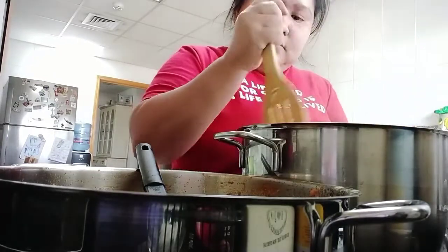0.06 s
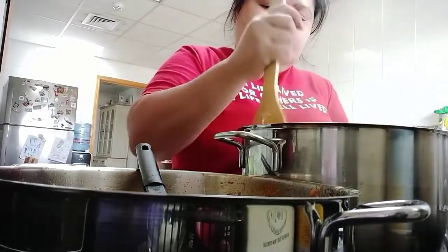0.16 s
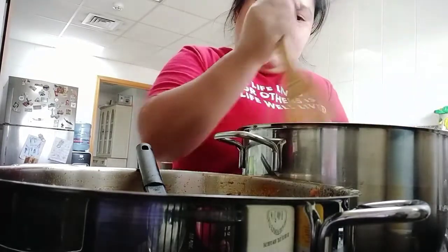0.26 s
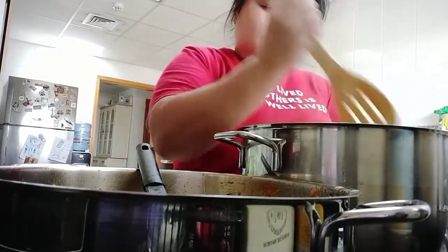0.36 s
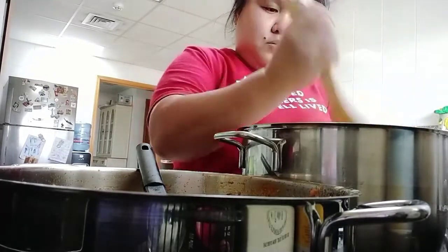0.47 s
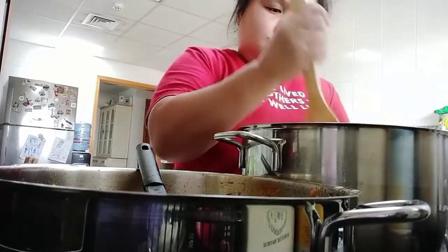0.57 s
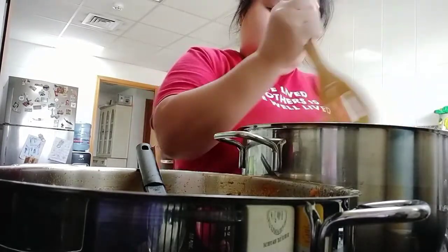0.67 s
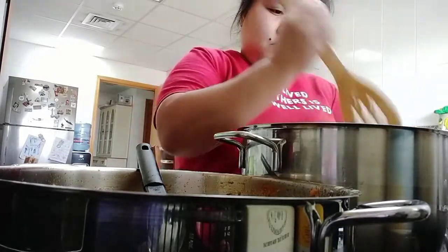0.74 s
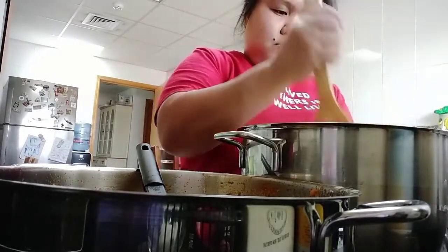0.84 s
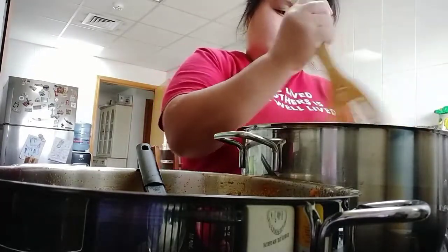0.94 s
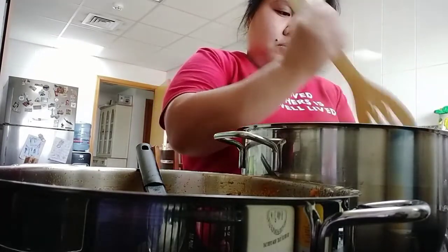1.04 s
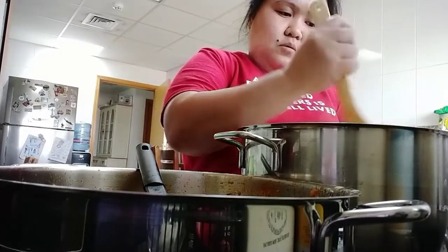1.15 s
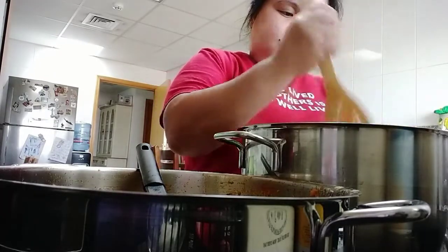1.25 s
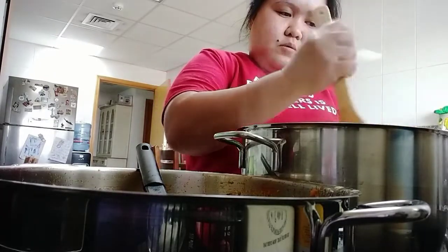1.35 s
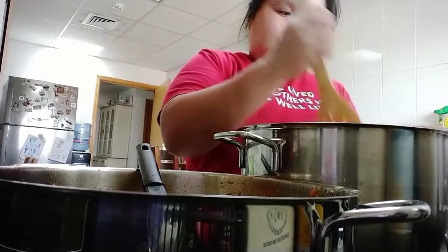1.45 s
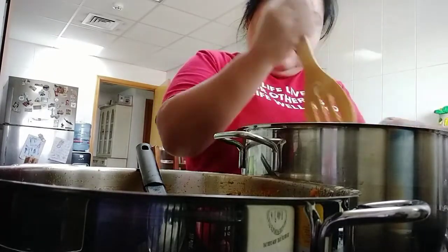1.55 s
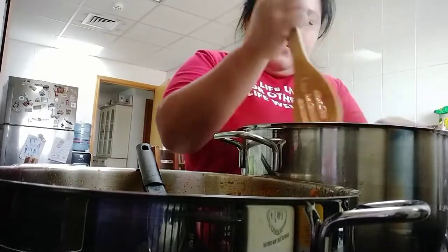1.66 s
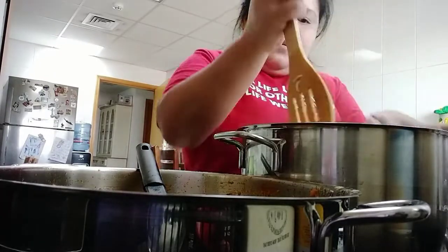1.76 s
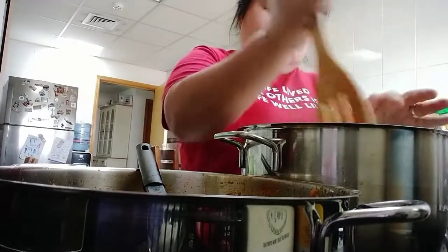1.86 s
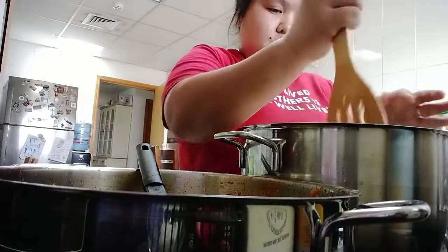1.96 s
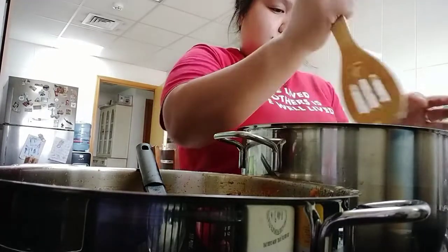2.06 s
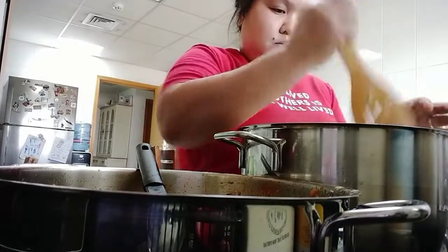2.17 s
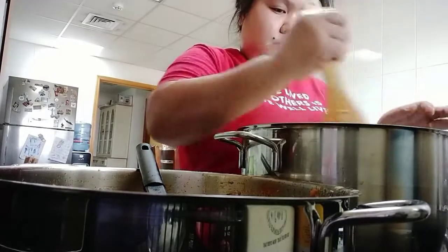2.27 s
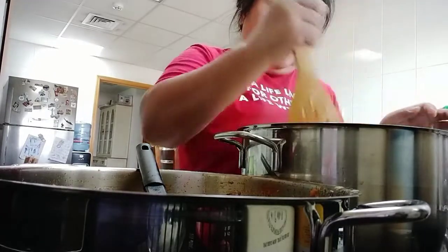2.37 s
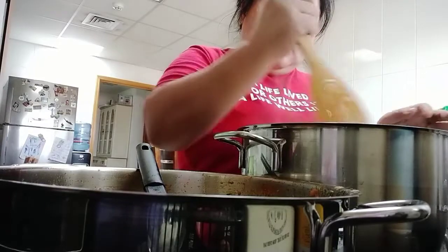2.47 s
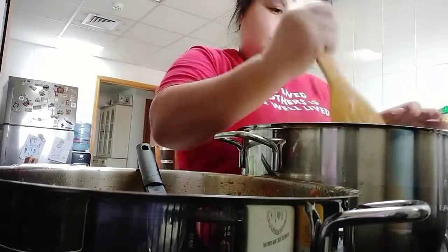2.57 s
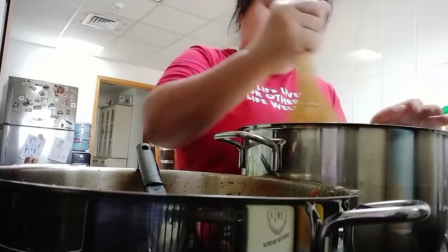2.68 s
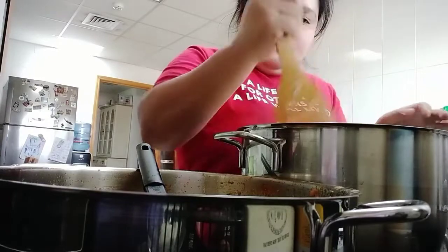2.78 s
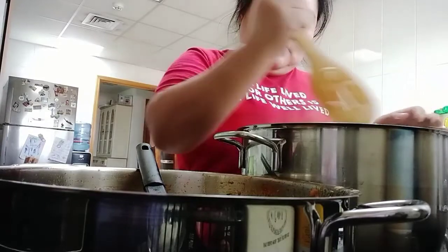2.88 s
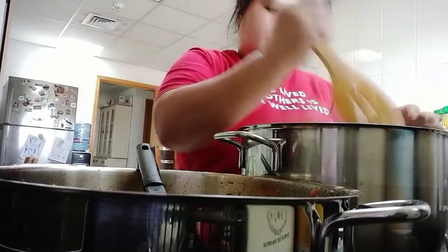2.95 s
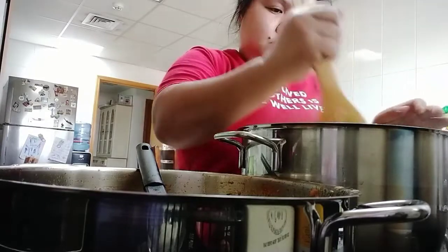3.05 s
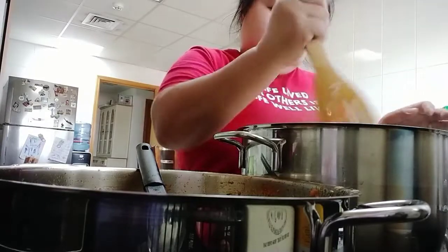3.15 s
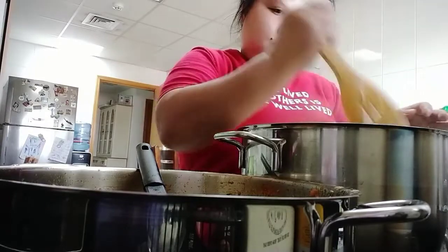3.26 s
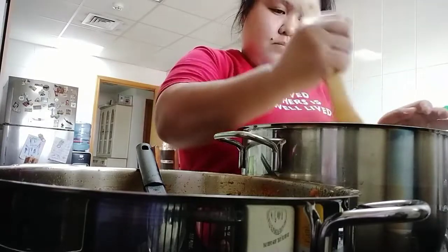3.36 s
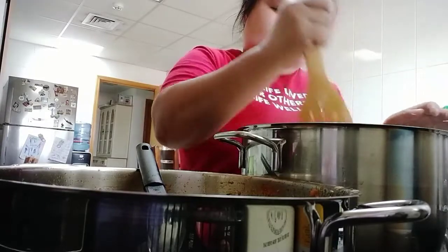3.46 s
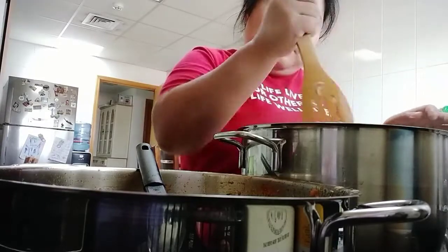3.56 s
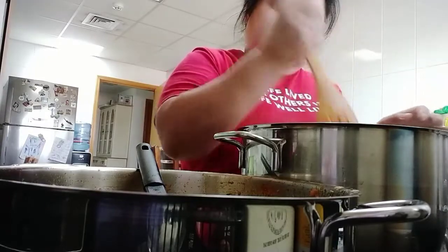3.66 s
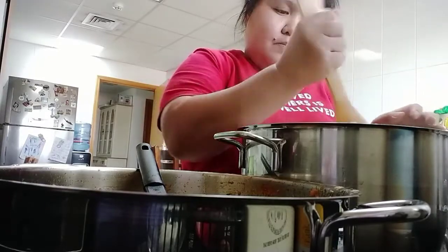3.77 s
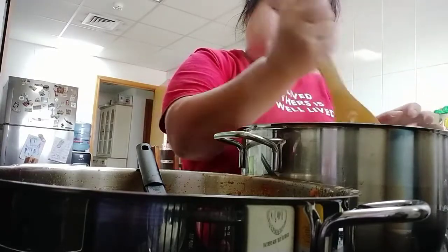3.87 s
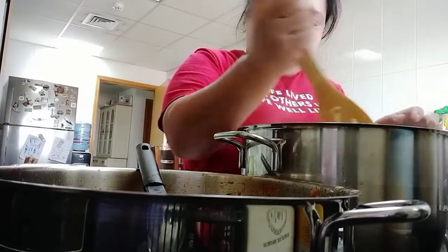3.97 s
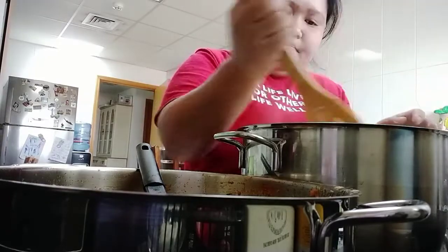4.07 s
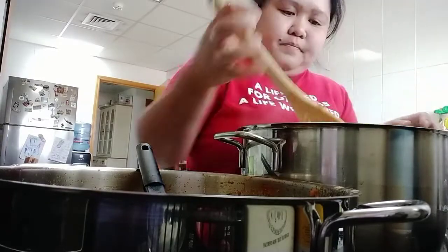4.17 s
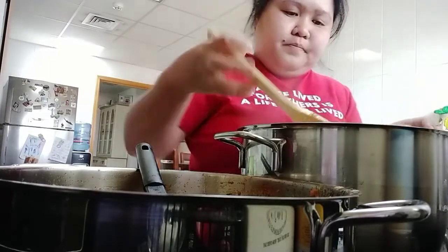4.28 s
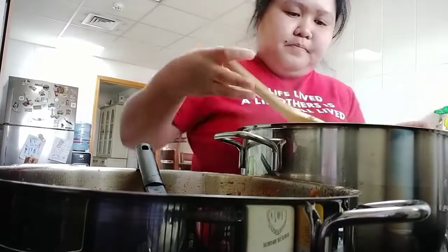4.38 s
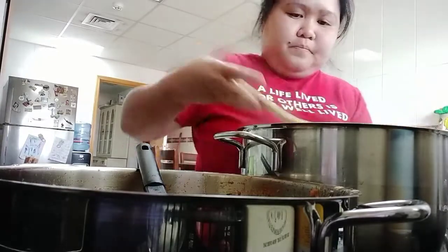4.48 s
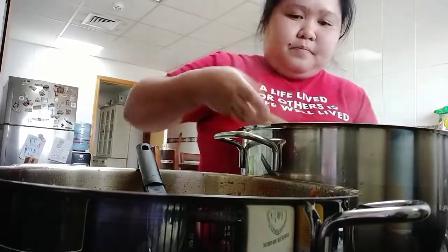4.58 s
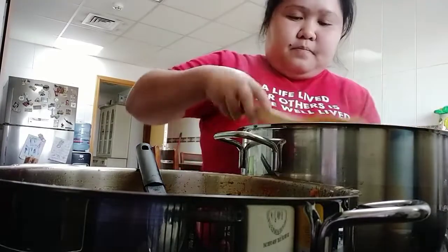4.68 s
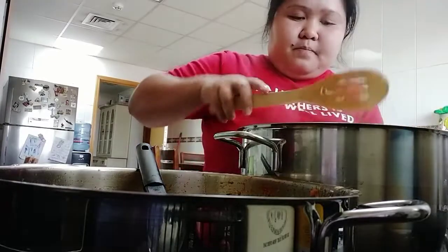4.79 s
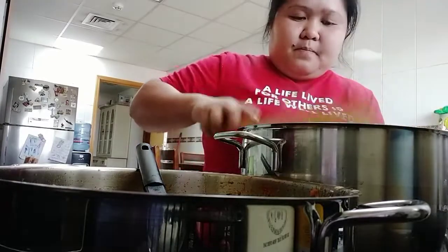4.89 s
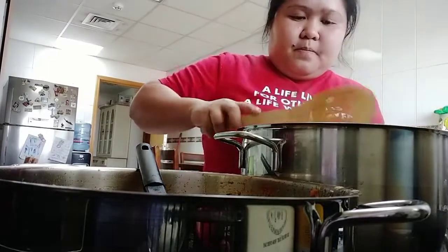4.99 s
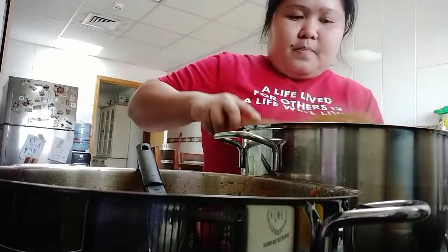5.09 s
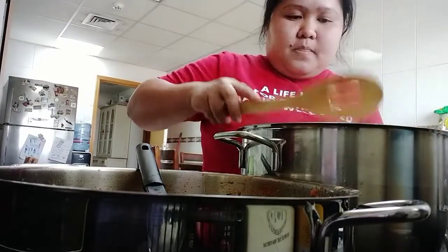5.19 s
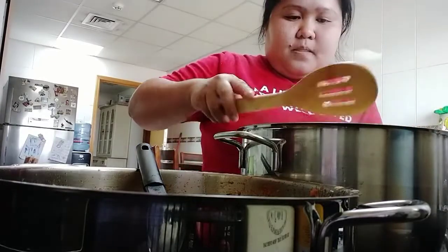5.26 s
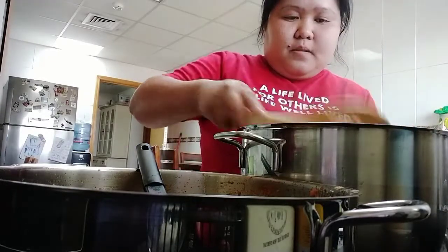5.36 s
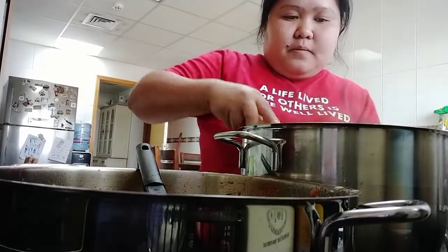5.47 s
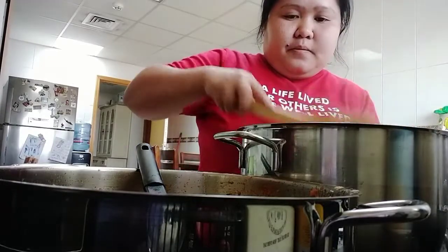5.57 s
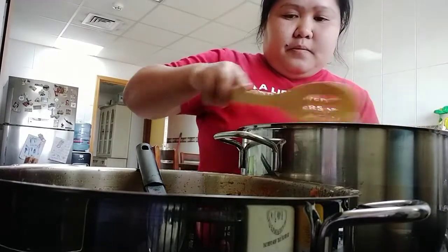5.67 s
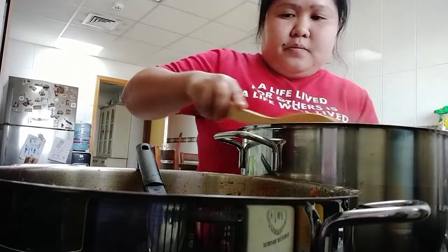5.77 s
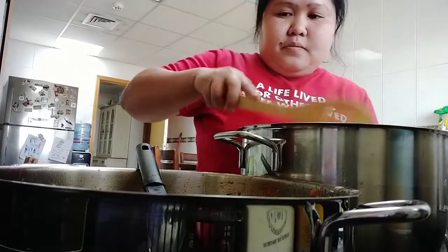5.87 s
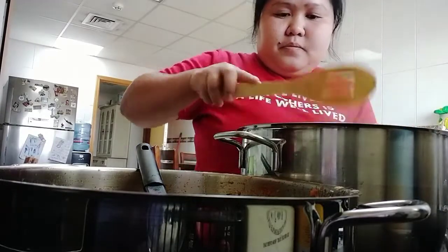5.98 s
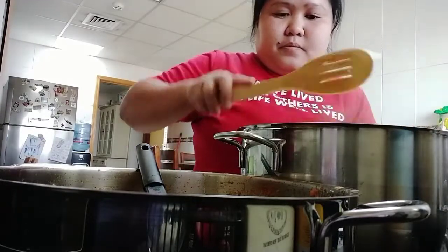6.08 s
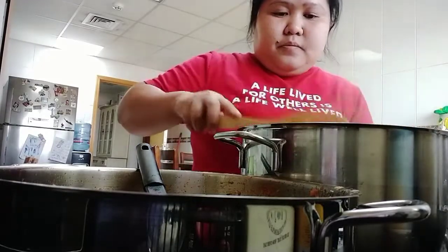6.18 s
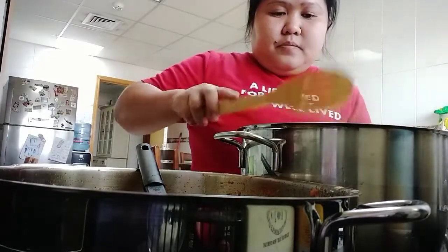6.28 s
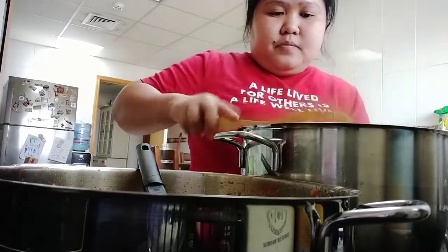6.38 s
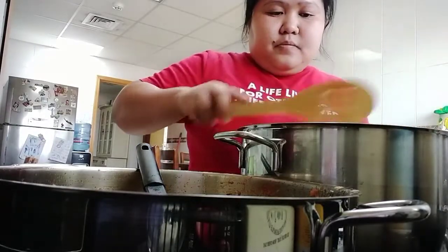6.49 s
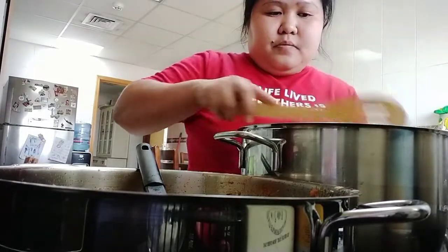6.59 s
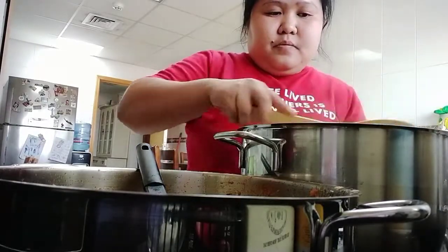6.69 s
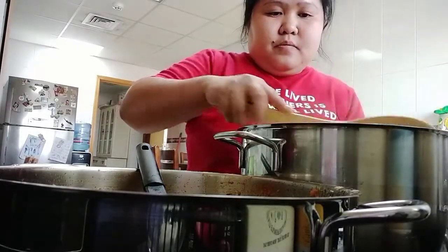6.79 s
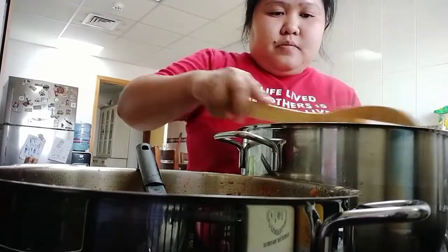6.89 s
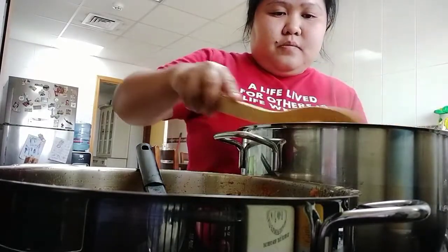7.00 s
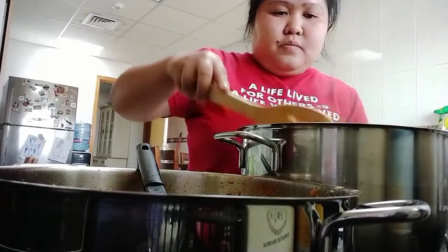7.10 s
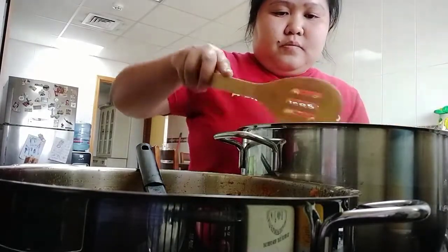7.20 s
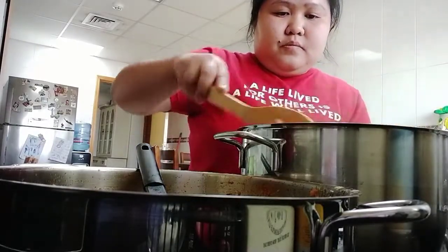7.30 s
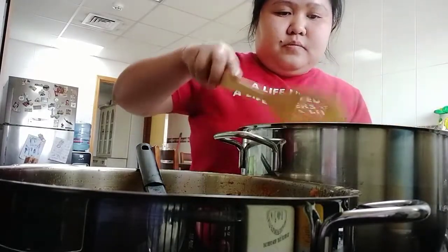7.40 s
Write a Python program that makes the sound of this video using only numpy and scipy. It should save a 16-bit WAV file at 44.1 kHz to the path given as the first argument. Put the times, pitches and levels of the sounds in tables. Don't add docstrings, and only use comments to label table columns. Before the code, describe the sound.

A quiet tiled kitchen, heard from a phone close to the pots: a steady soft mid-range rush of gas flame and fan, low rumble and two motors humming around 100 Hz with a slow beat. At the start the tail of an earlier metallic knock dies away. From 0 to 4.9 s a wooden spatula slides in a large loaded steel pot, giving faint airy hisses; a thin, shaky, high squeal swells around 0.8 s and fades by 1.5. Light woody taps come at 1.8 to 2.0 s, and a small tick with brisker scraping around 4.2. Then loud hard knocks on the rim at 4.90 and 5.06 s, clacky with a short dull steel ring and low stove thump. A second pair lands at 6.13 and 6.36 s, the last sharpest; background briefly dips after each of these. A faint low tap at 6.46, then ringing fades into hum until 7.4 s.

```python
import sys
import numpy as np
from scipy import signal
from scipy.fft import rfft, irfft, next_fast_len
from scipy.io import wavfile
from scipy.ndimage import uniform_filter1d, map_coordinates

SR = 44100
rng = np.random.default_rng(int(sys.argv[2]) if len(sys.argv) > 2 else 0)


def wav_out(sig):
    wavfile.write(sys.argv[1], SR, np.round(np.clip(np.atleast_2d(sig).T, -1, 1) * 32767).astype(np.int16))


def boost_factor(decibels):
    exponent = np.asarray(decibels, float) / 20
    return 10 ** exponent


N = 328104


def unit(x):
    return x / np.sqrt(np.mean(x ** 2) + 1e-20)


def along(points, hz):
    point_hz, value = np.transpose(points)
    return np.interp(np.log(hz + 1), np.log(point_hz + 1), value)


def wobble(rate_hz):
    knots = rng.standard_normal(int(N * rate_hz / SR) + 4)
    return map_coordinates(knots, [np.arange(N) * rate_hz / SR])


def noise(spectrum, size, patchy_db=0):
    z = signal.stft(rng.standard_normal(size + 2048), nperseg=512)[2]
    field = uniform_filter1d(rng.standard_normal(z.shape), size=5, axis=0)
    field = uniform_filter1d(field, size=10, axis=1)
    x = signal.istft(z * boost_factor(patchy_db * unit(field)), nperseg=512)[1]
    m = next_fast_len(len(x))
    gain = boost_factor(along(spectrum, np.fft.rfftfreq(m, 1 / SR)))
    return unit(irfft(rfft(x, m) * gain, m)[1024:size + 1024])


def ring(modes, t, scatter_db, blur):
    out, steps = 0, np.arange(0, t[-1] + .01, 1 / 300)
    for hz, db, t60 in modes:
        walk = np.cumsum(rng.standard_normal(len(steps)))
        walk = np.interp(t, steps, walk) / np.sqrt(300)
        phase = 2 * np.pi * hz * t + blur * hz / 1000 * (walk - walk[0])
        out = out + boost_factor(db + rng.normal(0, scatter_db) - 60 * t / t60) * np.sin(phase)
    return out


def click(spectrum, size):
    pulse = irfft(boost_factor(along(spectrum, np.fft.rfftfreq(size, 1 / SR))), size)
    pulse = np.roll(pulse, 40)
    return pulse / np.linalg.norm(pulse)


def add(track, start_s, x):
    place = track[round(start_s * SR):][:len(x)]
    place += x[:len(place)]


# time_s, level_db
RUSH = [(0, -54.3), (4.1, -56.3), (5.4, -55.7), (6.4, -54.7), (7.44, -56)]
# freq_hz, density_db
RUSH_TONE = [(170, -42), (290, -11), (300, -9.5), (334, -8), (522, -10), (615, -7.5), (1110, -1),
             (1230, -6.5), (1400, -3), (1590, -8), (1940, -9.5), (2700, -20.5), (3220, -29), (4800, -38.5),
             (6240, -67), (10600, -120)]


def flame_and_fan():
    level_db = np.interp(np.arange(N) / SR, *np.transpose(RUSH))
    return boost_factor(level_db + 0.39 + 0.42 * wobble(3.03)) * noise(RUSH_TONE, N, patchy_db=0.7)


# freq_hz, density_db
RUMBLE = [(10, -4.5), (22, 1), (34, 1.5), (46, -6.5), (60, 3.5), (78, -11), (110, -11), (135, -15),
          (165, -14.5), (192, -9.5), (225, -12), (265, -8.5), (300, -20), (380, -59.5)]


def rumble():
    return boost_factor(-55.5) * noise(RUMBLE, N)


# freq_hz, density_db
HISS = [(2060, -35), (3500, -28.5), (5240, 0.5), (6020, -1.5), (7600, -2.5), (8250, 0), (10000, -6.5),
        (15100, 2.5), (15800, 1)]


def microphone_hiss():
    return boost_factor(-81.6) * noise(HISS, N)


# freq_hz, crest_s
MOTORS = [(100.05, 0), (96.6, .0032)]
MOTOR_DB = [-57.5, -61.5]


def motors():
    t, out = np.arange(N) / SR, 0
    for (hz, crest_s), db in zip(MOTORS, MOTOR_DB):
        out = out + boost_factor(db + 2.5 + .7 * wobble(2.3)) * np.cos(2 * np.pi * hz * (t - crest_s))
    return out


# freq_hz, rms_db
HUM = [(59.1, -67.5), (57, -68), (194.7, -73), (269.6, -73.5)]


def hum():
    t, out = np.arange(N) / SR, 0
    for hz, db in HUM:
        phase = 2 * np.pi * hz * t + 0.84 * wobble(2.5)
        out = out + boost_factor(db + 1 + 2.8 * wobble(3)) * np.sin(phase)
    return out


# freq_hz, density_db
EARLIER_TAIL = [(1060, -30), (1800, 2), (1850, -7), (2350, -1), (2680, -9), (3110, 1.5), (3700, -15),
                (4360, -3.5), (5360, -13), (6280, -10), (8050, -13), (9980, -20), (13000, -30)]


def earlier_blow():
    decay_db = -55 - 60 * np.arange(N) / SR / 0.51
    return boost_factor(decay_db) * noise(EARLIER_TAIL, N, patchy_db=.6)


# full_pressure_s, level_db, press_up_10db_s, brightness_db
STROKES = [(.42, -86, .1, 0), (.79, -86, .1, -2), (1.04, -90, .06, -1), (1.37, -86, .08, -1),
           (1.665, -71, .04, -3), (1.897, -69, .01, -14), (2.21, -78, .035, -2), (2.27, -88, .02, 0),
           (2.365, -86, .015, 1), (2.395, -81, .02, 1), (2.63, -86, .05, 4), (2.67, -86, .02, -8),
           (2.99, -82, .05, -1), (3.335, -81.5, .04, 1), (3.74, -91, .04, 1), (4.05, -84, .06, -4),
           (4.12, -73, .045, 1), (4.19, -78, .02, -1), (4.23, -82, .05, 2), (4.3, -83, .06, 1),
           (4.42, -87, .06, -6), (4.57, -82, .04, 0), (4.69, -81, .06, -6), (4.75, -76, .05, 1),
           (4.81, -80, .04, -4)]
LET_GO = .6
DRAG_DB, DRAG_ENDS_S = -95, 4.89


def pressure():
    t = np.arange(0, N / SR, .001)
    low = top = boost_factor(DRAG_DB) * (t < DRAG_ENDS_S)
    for full_s, db, press_s, bright_db in STROKES:
        off_peak = np.maximum((full_s - t) / press_s, (t - full_s) / (LET_GO * press_s))
        stroke = boost_factor(db - 10 * off_peak)
        low = np.hypot(low, stroke)
        top = np.hypot(top, boost_factor(bright_db) * stroke)
    return [np.interp(np.arange(N) / SR, t, gain) for gain in (low, top)]


# freq_hz, density_db
SCRAPE_TONE = [(2060, -39), (3500, -9), (3970, 0), (4730, -2), (4990, -4), (5650, 0.5), (6360, -0.5),
               (7590, -0.5), (9000, -6), (11700, -36), (19800, -120)]
# freq_hz, density_db
SCRAPE_TOP = [(5290, -31), (9000, -5), (10100, -4), (12200, -1), (13100, -2), (15800, -4)]


def scrape():
    low, top = pressure()
    hiss = low * noise(SCRAPE_TONE, N, patchy_db=3) + top * noise(SCRAPE_TOP, N, patchy_db=1.5)
    return boost_factor(3 + 2.2 * wobble(120)) * hiss


# start_s, peak_s, end_s, level_db, pitch_hz
SING = [
    (.1, .82, 1.55, -71.5, 6450),
    (4.2, 4.33, 4.66, -83.5, 6290),
]
SWELL_DB_PER_S, FADE_DB_PER_S, SAG_HZ_PER_S, SING_T60_S = 9, 21, 85, .2


def wall_singing():
    t, out = np.arange(N) / SR, np.zeros(N)
    shiver_hz = 50 * wobble(270)
    flutter_db = 2.2 * wobble(70) + 2.6 * wobble(28)
    for start_s, peak_s, end_s, db, hz in SING:
        level_db = db - np.maximum(SWELL_DB_PER_S * (peak_s - t), FADE_DB_PER_S * (t - peak_s))
        level_db = level_db - 60 * np.maximum(t - end_s, 0) / SING_T60_S
        phase = 2 * np.pi * np.cumsum(hz - SAG_HZ_PER_S * (t - start_s) + shiver_hz) / SR
        out += (t > start_s) * boost_factor(level_db + flutter_db) * np.sin(phase)
    return out


# freq_hz, t60_s
KITCHEN = [(100, 1), (300, 0.55), (1400, 0.33), (3000, 0.62), (6000, 0.46), (10000, 0.4), (15000, 0.17)]


def kitchen(x, delay_s):
    hz, t, z = signal.stft(rng.standard_normal(len(x)), SR, nperseg=256)
    decay = boost_factor(-60 * t / along(KITCHEN, hz)[:, None])
    tail = signal.istft(z * decay, SR, nperseg=256)[1]
    late = np.pad(x, (round(delay_s * SR), 0))
    return signal.fftconvolve(late, tail / np.linalg.norm(tail))[:len(x)]


# start_s, tick_db, body_db, body_hz, stove_db
TAPS = [
    (0.4105, -63, 7, 1080, 1),
    (1.8108, -52, 21, 1040, 9),
    (1.8855, -53, 15, 980, 8),
    (1.9104, -70, 20, 940, 1),
    (2.0318, -67, 4, 940, 1),
    (4.1844, -56.5, -6, 1080, -12),
    (6.456, -56, 17, 210, 8),
]
# freq_hz, level_db, t60_s
STOVE = [(74, -4, 0.28), (113.6, -2, 0.17), (184, -2, 0.16), (214.3, 0.5, 0.24), (270, -2, 0.34),
         (344.5, -2, 0.21), (385, 0, 0.18), (450, -3.5, 0.19), (519, 0, 0.14), (619, 1, .12),
         (669, 0, 0.13), (737, 2, 0.11), (880, -4, 0.3)]


def taps():
    out, t = np.zeros(N), np.arange(SR // 4) / SR
    tick_rise = 1 - np.exp(-(t / .0007) ** 2)
    body_rise = 1 - np.exp(-(t / 0.0018) ** 2)
    stove_modes = [(hz, level_db, t60 * 0.67) for hz, level_db, t60 in STOVE[4:]]
    for start_s, db, body_db, body_hz, stove_db in TAPS:
        tick_hz = 3.9 * body_hz
        band = [(tick_hz / 3, -20), (tick_hz / 1.4, -3), (tick_hz, 0),
                (tick_hz * 1.15, -9), (tick_hz * 1.7, -20), (tick_hz * 3, -60)]
        tick = noise(band, len(t)) * boost_factor(0.5 - 60 * t / 0.028) * tick_rise
        wood_modes = [(body_hz, 0, .05), (body_hz * .88, -9, .05), (body_hz * 1.2, -9, .05)]
        wood = ring(wood_modes, t, scatter_db=.6, blur=2.5)
        stove = ring(stove_modes, t, scatter_db=0, blur=2.8)
        body = boost_factor(body_db + 4.5) * wood + boost_factor(stove_db - 3.5) * stove
        touch = tick + body * body_rise
        add(out, start_s, boost_factor(db) * (touch + boost_factor(-13.5) * kitchen(touch, delay_s=0.0056)))
    return out


# freq_hz, level_db, t60_s
SPATULA = [(200, -11, .05), (360, -8, .05), (520, -10, .04), (680, -7, .04), (1080, -1, .04),
           (1320, 1.5, .04), (1500, -7, .03), (1860, -15, .04)]
# freq_hz, density_db
KNOCK = [(250, -39), (480, -8.5), (700, -7.5), (850, -14.5), (1050, -2.5), (1300, 2), (1520, -5.5),
         (1700, -18), (1900, -12.5), (2150, -27), (2900, -26.5), (3500, -40.5), (4500, -33), (5900, -54)]
# freq_hz, density_db
EDGE = [(1940, -47), (3300, -14.5), (4480, -8.5), (5080, -17), (6560, -2), (7230, -6), (8480, -6),
        (9080, -15), (10500, -23), (13600, -50), (22000, -120)]
# freq_hz, density_db
SNAP = [(6000, -44), (9500, -3), (12000, -6), (15000, -1), (17000, -8)]


def blow(db, edge_db, snap_db, thump_db, modes):
    t = np.arange(SR // 2) / SR

    def rise(time_s):
        return 1 - np.exp(-t / time_s)

    def burst(tone, t60):
        return noise(tone, len(t)) * boost_factor(-60 * t / t60)

    clack = boost_factor(-3) * rise(.0009) * ring(SPATULA, t, scatter_db=1.5, blur=3)
    knock = boost_factor(-8) * rise(.0009) * burst(KNOCK, t60=.09)
    thump = boost_factor(thump_db - 1.7) * rise(.003) * ring(STOVE, t, scatter_db=1.1, blur=14)
    wall = boost_factor(-15.5) * rise(.003) * ring(modes, t, scatter_db=1.5, blur=6)
    edge = boost_factor(edge_db + .3) * rise(0.00057) * burst(EDGE, t60=.045)
    snap = boost_factor(snap_db + 2.5) * rise(.0003) * burst(SNAP, t60=0.025)
    body = clack + knock + thump + wall
    sharp = boost_factor(edge_db + 22.5) * click(EDGE, len(t)) + boost_factor(snap_db + 21) * click(SNAP, len(t))
    return boost_factor(db) * (body + edge + snap + boost_factor(-9) * kitchen(body + sharp, delay_s=.006))


# start_s, peak_db, edge_db, snap_db, thump_db
BLOWS = [
    (4.904, -11, -31, -44, -21.5),
    (5.059, -11, -24, -31.5, -23),
    (6.1345, -10.5, -23, -45, -20.5),
    (6.362, -10, -20.5, -29, -21.5),
]
# freq_hz, level_db, t60_s
RIM_NEAR = [(978, -6, 0.3), (1040, 2, 0.19), (1078, -0.5, 0.25), (1130, 2, .2), (1254, 6, 0.11),
            (1285, -11, 0.11), (1402, 5, 0.2), (1495, -7, 0.14), (1560, -19, .2), (1870, -17, 0.11),
            (2295, -22.5, 0.36), (2815, -22, .25), (2930, -28, .33), (3130, -29, 0.32), (4370, -34, .4),
            (6060, -38, .25), (6380, -29, 0.23)]
# freq_hz, level_db, t60_s
RIM_FAR = [(947, -10.5, 0.47), (993, -14, 0.46), (1040, -1, 0.26), (1083, -3.5, 0.15), (1135, -3, 0.22),
           (1249, -0.5, 0.16), (1308, -5, 0.15), (1352, 4, 0.14), (1430, -6, 0.27), (1506, -4.5, 0.21),
           (1537, -15, 0.26), (1815, -8.5, 0.11), (2260, -26, 0.32), (2893, -20, 0.31), (3117, -25.5, 0.38),
           (4400, -31.5, 0.53), (5900, -33, 0.55), (6340, -16, 0.22), (6848, -29, 0.14)]


def rim_blows():
    out = np.zeros(N)
    for (start_s, *force_db), modes in zip(BLOWS, [RIM_NEAR, RIM_NEAR, RIM_FAR, RIM_FAR]):
        add(out, start_s, blow(*force_db, modes))
    return out


def scene():
    background = flame_and_fan() + rumble() + microphone_hiss() + motors() + hum()
    spatula = earlier_blow() + scrape() + wall_singing() + taps() + rim_blows()
    return (background + spatula)[None]


def low_pass(x):
    return signal.sosfilt(signal.butter(12, 16780, fs=SR, output="sos"), x)


# blow_s, depth_db, hold_until_s (after the blow)
DUCKS = [
    (6.135, 2.5, .2),
    (6.362, 4, .075),
]
# freq_hz, gain_db
BAND_LIMIT = [(20, 0), (15800, 0), (15900, -20), (16800, -30)]


def record(dry):
    t, duck_db = np.arange(N) / SR, np.zeros(N)
    for blow_s, depth_db, hold_s in DUCKS:
        duck_db += depth_db * np.interp(t - blow_s, [.008, .025, hold_s, hold_s + .02], [0, 1, 1, 0])
    response = boost_factor(along(BAND_LIMIT, np.fft.rfftfreq(N, 1 / SR)))
    heard = irfft(rfft(dry * boost_factor(-duck_db)) * response, N)
    heard = heard / (1 + np.abs(heard / .4) ** 4) ** .25
    return low_pass(heard)


dry = scene()
out = record(dry)
wav_out(out)
```